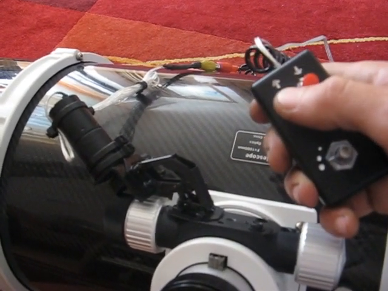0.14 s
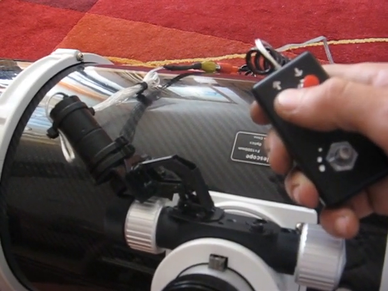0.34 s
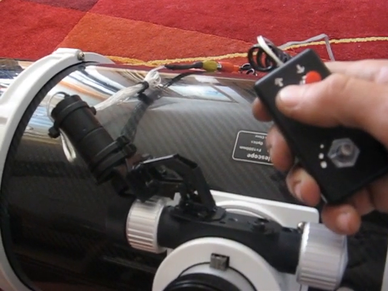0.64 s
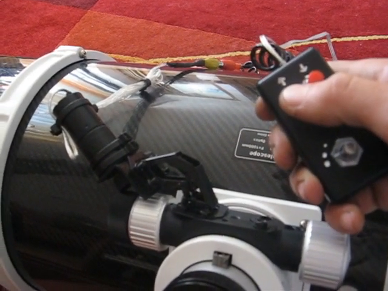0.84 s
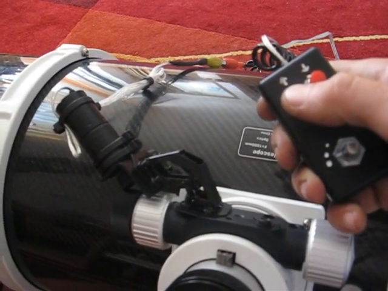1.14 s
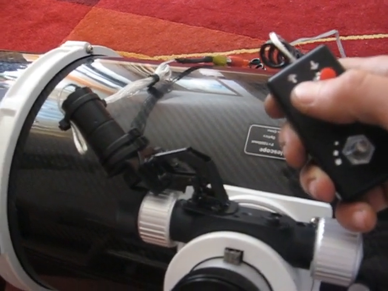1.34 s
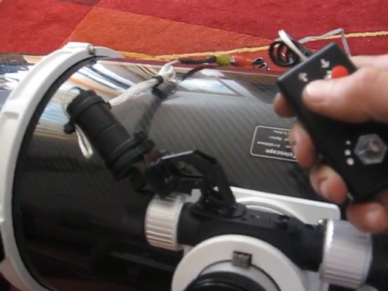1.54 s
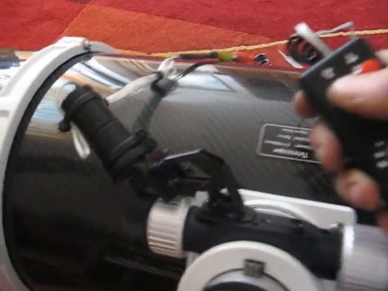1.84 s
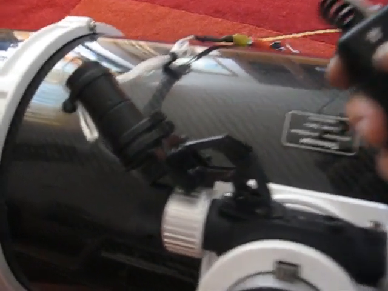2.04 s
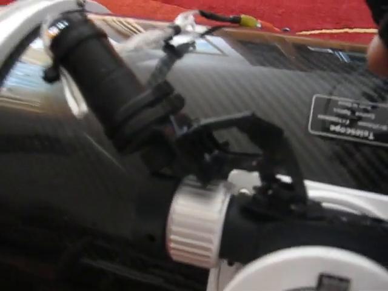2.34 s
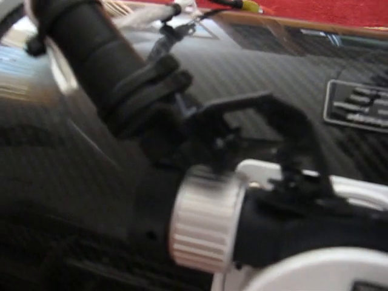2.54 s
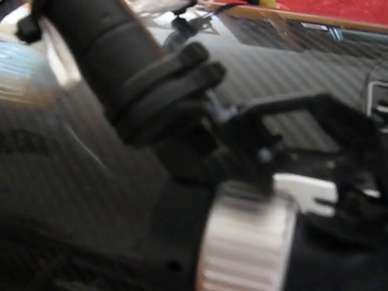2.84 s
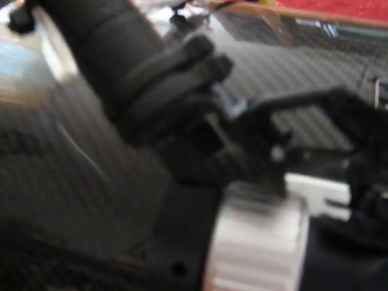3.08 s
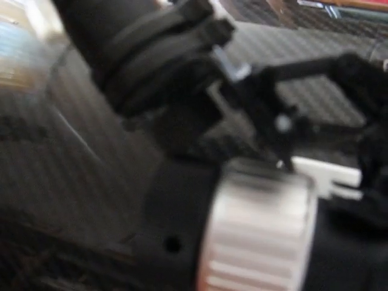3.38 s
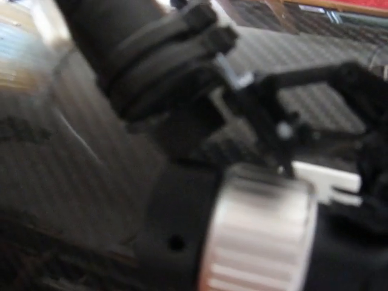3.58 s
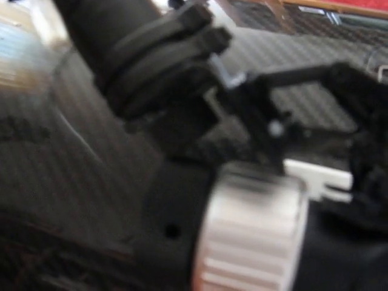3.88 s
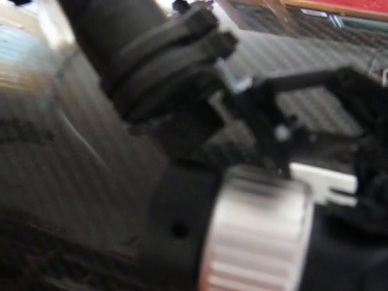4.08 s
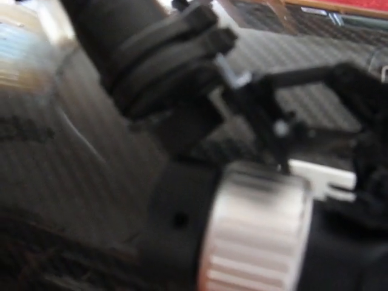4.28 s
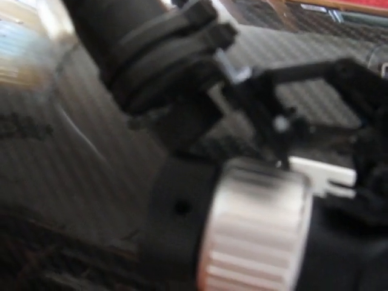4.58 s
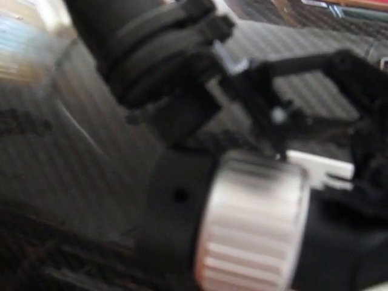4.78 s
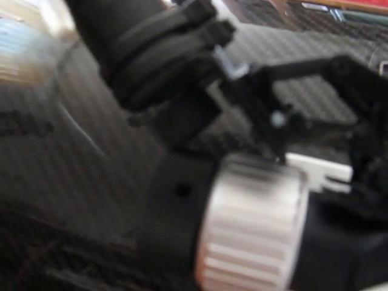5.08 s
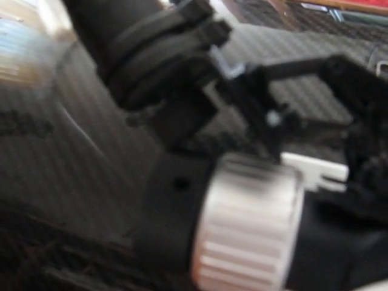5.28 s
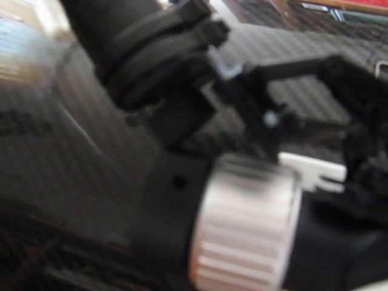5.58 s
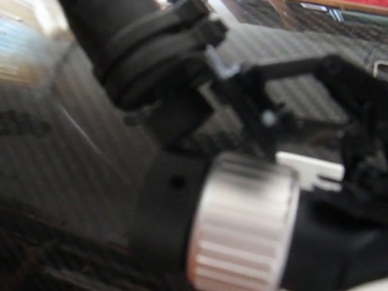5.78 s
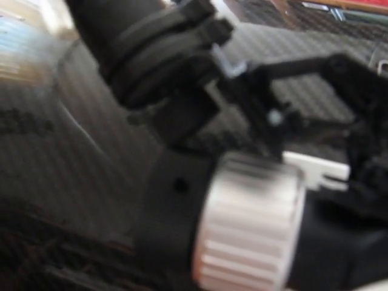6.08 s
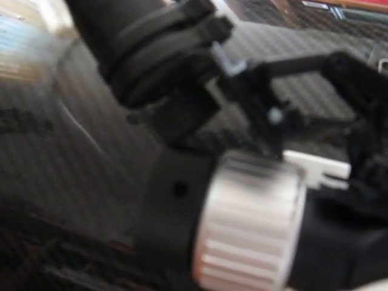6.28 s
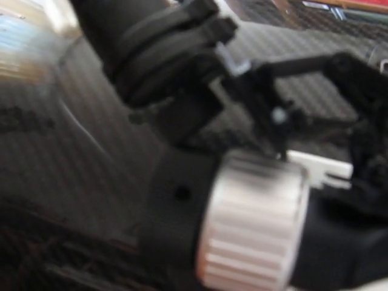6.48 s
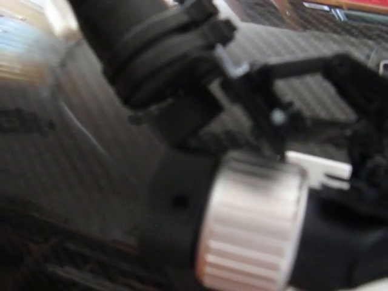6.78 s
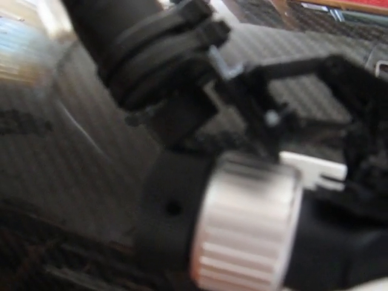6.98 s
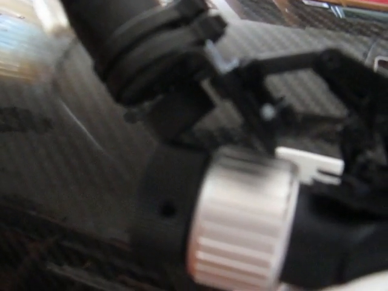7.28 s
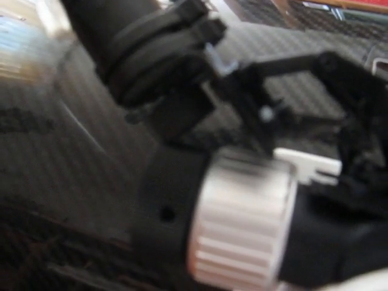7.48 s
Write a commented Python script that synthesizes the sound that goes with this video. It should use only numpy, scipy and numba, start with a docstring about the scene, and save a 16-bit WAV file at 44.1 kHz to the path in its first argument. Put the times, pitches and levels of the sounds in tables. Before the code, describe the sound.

A small geared electric motor turns a telescope's focus knob with a steady, hissy whir and a high whine. It grows louder as the microphone moves in, with a few soft knocks. The motor stops with sharp clicks of gears and a button, then restarts almost at once, chafing with a thin squeal, and ends on a click. The sound is close, dry and slightly grainy, in a small room.

```python
"""A small geared DC motor turns a telescope's focus knob, worked from a push-button box in a small room.
It runs forward, its 12-tooth pinion whining and rattling in the gearbox. The microphone moves in, with
soft knocks; late in the run the coupling rubs. At 5.4 s the motor stops; gears and a button click.
From 5.7 s it runs back, chafing and squealing once a turn, and stops with a click at 7.5 s.
A pocket camera takes the sound in mono, 8 bits at 11025 Hz."""
import sys
import numpy as np
from scipy import signal
from scipy.fft import rfft, irfft, next_fast_len
from scipy.io import wavfile
from numba import njit

SR = 44100
rng = np.random.default_rng(int(sys.argv[2]) if len(sys.argv) > 2 else 0)


def file_out(sig):
    """Save sig as 16-bit WAV at sys.argv[1]."""
    # one column per channel
    cols = np.atleast_2d(sig).T
    # limit, then scale
    lim = np.clip(cols, -1, 1)
    pcm = np.round(lim * 32767).astype(np.int16)
    wavfile.write(sys.argv[1], SR, pcm)


N = 336483
T = np.arange(N) / SR
TEETH, COMMUTATOR_BARS = 12, 3
# levels/dB: afar, beside the motor, at the coupling, running back
RATTLE_DB, MESH_DB = (-36.5, -31, -31.5, -34.5), (-52.5, -46.3, -47.5, -56)
# housing resonances: f/Hz, width/Hz, relative level/dB (afar, beside, coupling, back)
HOUSING_MODES = [(2051, 220, -11, -13, -16, -26), (2260, 240, -11, -11.5, -12, -12.5),
                 (2730, 200, -6.5, -6.5, -6, -8.5), (2992, 280, -7, -4, -2, -7),
                 (3490, 260, -6, -4, -7.5, -6), (3739, 220, -4, -4.5, -2, -5),
                 (3956, 240, -14, -5, -10, -6.5), (4580, 220, -1.5, -8, -3, -30),
                 (4770, 200, -8, -11, -5, -7.5), (4985, 160, -5, -6, -5, -11),
                 (5162, 220, -2, -8.5, -7, -11.5), (5472, 280, -11, -4, -5.5, -5.5)]
# weak shaft harmonics: order, level/dB re rattle (afar, beside, coupling, back)
SHAFT_HARMONICS = [dict(order=1, db=(-21.5, -27.5, -27, -37)), dict(order=4, db=(-38.5, -31, -30.5, -34.5)),
                   dict(order=5, db=(-20, -26, -36.5, -30)), dict(order=8, db=(-32, -25, -34, -44.5)),
                   dict(order=9, db=(-24.5, -26, -34.5, -33.5)),
                   dict(order=10, db=(-32, -29, -31.5, -38.5)),
                   dict(order=14, db=(-30.5, -28.5, -28.5, -38)),
                   dict(order=15, db=(-39, -28, -27.5, -41.5)),
                   dict(order=16, db=(-27, -35.5, -38.5, -39.5)), dict(order=23, db=(-32, -25, -29.5, -25)),
                   dict(order=24, db=(-31, -24.5, -27.5, -23)), dict(order=35, db=(-31, -35.5, -31.5, -23)),
                   dict(order=36, db=(-12.5, -15, -20, -43.5)), dict(order=37, db=(-24.5, -32, -26, -20)),
                   dict(order=38, db=(-19.5, -19, -24.5, -22)),
                   dict(order=40, db=(-14.5, -23.5, -27, -23.5)),
                   dict(order=41, db=(-17.5, -23.5, -25, -26)), dict(order=44, db=(-21.5, -19.5, -29, -24)),
                   dict(order=46, db=(-23, -28, -34, -40)), dict(order=49, db=(-19.5, -22, -32, -34)),
                   dict(order=60, db=(-31.5, -15.5, -11, -27))]
# slow wheels pressing on the teeth: turns per shaft turn, depth/dB
SLOW_WHEELS = [(.1485, .55), (.548, .45)]


def from_db(db):
    """Decibels to gain."""
    return 10 ** (np.asarray(db) / 20)


def rms_one(x):
    """Scale to rms 1."""
    return x / np.sqrt(np.mean(x ** 2) + 1e-20)


def in_time(rows):
    """Each column of a breakpoint table at every sample."""
    times_s, *columns = np.transpose(rows)
    return [np.interp(T, times_s, column) for column in columns]


def low_pass(x, hz):
    """Second-order Butterworth."""
    return signal.sosfilt(signal.butter(2, min(hz, SR / 3), fs=SR, output="sos"), x + 1e-18)


def drift(hz):
    """Slow noise up to about hz; rms 1."""
    step = 20
    slow = low_pass(rng.standard_normal((N + SR) // step + 2), hz * step)[SR // step:]
    return rms_one(np.interp(T, np.arange(len(slow)) * step / SR, slow))


def dying(start_s, tau_s):
    """1 until start_s, then exponential decay."""
    return np.exp(-np.maximum(T - start_s, 0) / tau_s)


def swell(centre_s, half_width_s):
    """Gaussian bump, peak 1."""
    return np.exp(-((T - centre_s) / half_width_s) ** 2)


@njit
def resonance(x, hz, width_hz):
    """Two-pole band-pass, peak gain 1, moving centre."""
    r, y = np.exp(-np.pi * width_hz / SR), np.zeros(len(x))
    for i in range(2, len(x)):
        drive = (x[i] - x[i - 2]) * (1 - r * r) / 2
        y[i] = drive + 2 * r * np.cos(2 * np.pi * hz[i] / SR) * y[i - 1] - r * r * y[i - 2]
    return y


def heard_from(place, levels_db):
    """Each partial radiates its own way: level/dB along the microphone's path."""
    return np.interp(place, np.arange(len(levels_db)), levels_db)


def shaft(full_hz, on_s, off_s, flutter, coast_db, coast_s):
    """Run-up from rest and coast-down: shaft turns, and a gate for the sound."""
    run_up = 1 - dying(on_s, tau_s=.051)
    creep_hz = .143 * (T - on_s)   # the grease loosens
    lag_hz = .7 * dying(on_s, tau_s=.35)
    speed_hz = full_hz * run_up + creep_hz - lag_hz
    turns = np.cumsum(speed_hz * (1 + flutter * drift(12))) / SR
    coasting = from_db(coast_db) * dying(off_s, coast_s)
    return turns, low_pass((T >= on_s) * np.where(T < off_s, 1, coasting), 300)


def gear_effort_db(start_s, depth_db, rise_s, waver_db):
    """The gears grow loud, then waver with the load."""
    return -depth_db * dying(start_s, rise_s) + waver_db * drift(5.6)


def tooth_forces(turns, chafe_db, scatter, slide_db, mesh_depth, uneven_db):
    """One force per housing mode: teeth land unevenly, then slide; an off-centre wheel chafes each turn."""
    angle = 2 * np.pi * turns
    lands = np.diff(np.floor(TEETH * turns), prepend=0) > 0
    grip = 1 + mesh_depth * np.cos(TEETH * angle)
    chafe = np.cos(angle) + .5 * np.cos(2 * angle) + .15 * np.cos(TEETH / 2 * angle)
    wheels_db = sum(db * np.cos(ratio * angle) for ratio, db in SLOW_WHEELS)
    pressure = from_db(chafe_db * chafe + uneven_db * drift(70) + wheels_db)
    for _ in HOUSING_MODES:
        impacts = rms_one(lands * rng.choice([-1, 1], N) * (1 + scatter * rng.standard_normal(N)))
        sliding = from_db(slide_db) * grip * rng.standard_normal(N)
        yield (impacts + sliding) * pressure


def gearbox(forces, levels_db):
    """The housing rings in modes that wander in pitch and level; rms 1."""
    modes = [resonance(force, hz * (1 + .01 * drift(5)), float(width_hz)) * from_db(db + .5 * drift(9))
             for force, (hz, width_hz, *_), db in zip(forces, HOUSING_MODES, levels_db)]
    return rms_one(sum(modes))


def tube_vibration():
    """Dull noise of the tube that carries the motor; rms 1."""
    # tube spectrum: f/Hz, relative density/dB
    spectrum = [(25, -2), (60, -2.5), (160, -2.5), (400, -2), (700, -3), (1000, -6), (1350, -2),
                (1900, -2.5), (3000, -11), (6000, -22)]
    hz, level_db = np.transpose(spectrum)
    size = next_fast_len(N)
    bins_hz = np.maximum(np.arange(size // 2 + 1) * SR / size, 1)
    gain = from_db(np.interp(np.log(bins_hz), np.log(hz), level_db))
    return rms_one(irfft(rfft(rng.standard_normal(N), size) * gain, size)[:N])


def tone(turns, order, rms_db):
    """One shaft harmonic, random phase."""
    return np.sqrt(2) * from_db(rms_db) * np.sin(2 * np.pi * (order * turns + rng.random()))


def weak_harmonics(turns, on_s, rattle_db, levels_db, play_turns):
    """Starting torque lifts the harmonics at first; bearing play blurs the high ones most."""
    loaded_db = rattle_db + 6 * dying(on_s, tau_s=.12)
    shaken = turns + play_turns * drift(60)
    return sum(tone(shaken, row["order"], loaded_db + db) for row, db in zip(SHAFT_HARMONICS, levels_db))


def forward_mesh(turns, mesh_db):
    """Mesh tone, throbbing with a slow wheel; in two steps the coupling rubs it louder and rougher."""
    rub_db = 4 * (1 - dying(3.74, tau_s=.06)) + 2.3 * (1 - dying(4.72, tau_s=.06))
    throb = .13 * np.cos(2 * np.pi * SLOW_WHEELS[0][0] * turns)
    mesh = tone(turns + .0022 * drift(40), TEETH, mesh_db + rub_db)
    roughness = from_db(rub_db - 18) * drift(90)
    sideband = tone(turns, TEETH + 1, mesh_db + 2 * rub_db - 17)   # the rub comes once a turn
    return mesh * (1 + throb + roughness) + sideband


def ringing_band(hz, width_hz=170):
    """Noise keeps a narrow, steep-sided resonance ringing; rms 1."""
    centre_hz, width_hz = hz * np.ones(N), float(width_hz)
    band = resonance(rng.standard_normal(N), centre_hz, width_hz)
    return rms_one(resonance(band, centre_hz, width_hz))


def motor_forward():
    """The teeth mesh evenly and whine on their fourth harmonic. Returns noise, tones."""
    # microphone path: t/s, place (0 afar, 1 beside the motor, 2 at the coupling)
    path = [(0, 0.01), (1.2, 0.05), (1.7, 0.23), (2.05, 0.55), (2.45, 1.0), (3.0, 1.1), (3.5, 1.4),
            (3.9, 2.0), (5.4, 2.2)]
    # commutator hum: t/s, level/dB
    hum_curve = [(0.1, -62), (0.39, -57), (1.58, -59), (1.95, -50.5), (2.64, -47), (3.07, -61.5),
                 (4.6, -53), (4.82, -59.5), (5.38, -54.5)]
    # mesh whine: t/s, level/dB
    whine_curve = [(0.02, -51.5), (0.14, -49), (0.35, -44.3), (0.72, -40.6), (1.0, -42), (1.58, -42.6),
                   (1.95, -38.2), (2.4, -47), (2.66, -39.3), (2.95, -40), (3.15, -44), (3.75, -44.5),
                   (4.03, -40.7), (4.3, -44.3), (5.3, -42.7)]
    # gear noise surges and dips as the microphone moves in: t/s, half-width/s, gain/dB
    surges = [(2.62, .3, 1.1), (3.15, .08, -1.5), (3.55, .18, -1.1)]
    # brief narrow-band swells of ringing in the gear noise: t/s, half-width/s, f/Hz, level/dB
    ring_swells = [(1.999, .11, 4560, -42), (2.065, .08, 2907, -41.5), (2.331, .15, 3790, -42),
                   (2.601, .18, 3580, -42.5), (2.62, .15, 5500, -45.5), (3.299, .06, 2636, -43.5),
                   (3.299, 0.14, 4410, -44), (5.3, .25, 1203, -48)]
    on_s, off_s = -.19, 5.414
    (place,), (hum_db,), (whine_db,) = in_time(path), in_time(hum_curve), in_time(whine_curve)
    turns, gate = shaft(92.6, on_s, off_s, flutter=.0004, coast_db=-35, coast_s=.01)
    effort_db = gear_effort_db(on_s, depth_db=30.5, rise_s=.21, waver_db=.2)
    effort_db += sum(db * swell(at_s, width_s) for at_s, width_s, db in surges)
    rattle_db = effort_db + heard_from(place, RATTLE_DB[:-1])

    chafe_db = heard_from(place, (1.5, .8, .65))
    forces = tooth_forces(turns, chafe_db, scatter=.22, slide_db=-1, mesh_depth=.35, uneven_db=.45)
    modes_db = [heard_from(place, row[2:-1]) for row in HOUSING_MODES]
    noise = from_db(rattle_db) * gearbox(forces, modes_db)
    for at_s, width_s, hz, db in ring_swells:
        noise += from_db(db) * swell(at_s, width_s) * ringing_band(hz)
    noise += from_db(rattle_db - 15) * tube_vibration()

    harmonics_db = (heard_from(place, row["db"][:-1]) for row in SHAFT_HARMONICS)
    tones = weak_harmonics(turns, on_s, rattle_db, harmonics_db, play_turns=.0012)
    tones += tone(turns, COMMUTATOR_BARS, hum_db + .5)
    tones += forward_mesh(turns, effort_db + heard_from(place, MESH_DB[:-1]))
    jitter_turns = .0003 * place ** 2 * drift(60)
    tones += tone(turns + jitter_turns, 4 * TEETH, whine_db) * (1 + .03 * drift(25))
    return gate * noise, gate * tones


def ring(hz, crest_s):
    """A struck mode: swells to 1 at crest_s, then dies quickly."""
    t = T[:SR // 20]
    return t / crest_s * np.exp(1 - t / crest_s) * np.cos(2 * np.pi * hz * (t - crest_s))


def knocks():
    """Dull, damped bumps that reach the microphone as it moves in."""
    # bumps: t/s, f/Hz, level/dB, rise/s
    bumps = [(2.953, 1250, -34, .0005), (2.992, 1440, -37.5, .001), (3.228, 1420, -34, 0.0011),
             (3.445, 1200, -31.5, .0005), (3.661, 1450, -33, .0004), (3.671, 90, -42, 0.0018),
             (4.886, 95, -36, 0.0028)]
    out = np.zeros(N)
    for at_s, hz, db, crest_s in bumps:
        blow, start = from_db(db) * ring(hz, crest_s), round(at_s * SR)
        out[start:start + len(blow)] += blow
    return out


def clicks():
    """Hard contacts: a bright ring, a plastic knock and a soft thump of the mount."""
    # gears taking up play, and a button: t/s, ring f/Hz, ring/dB, knock/dB, thump/dB
    contacts = [(5.4124, 3500, -35, -16.5, -53), (5.4132, 3450, -20.5, -51, -26.5),
                (5.537, 3400, -26, -37, -71.5), (5.5374, 3400, -36, -20.5, -54.5),
                (5.539, 3750, -28, -50, -66.5), (5.5401, 3600, -33.5, -34.5, -66.5),
                (5.7065, 3860, -19.5, -49.5, -72), (5.7079, 2900, -33, -50, -76),
                (5.7105, 3500, -42, -34, -76), (7.5182, 3700, -29, -50, -70),
                (7.5204, 3500, -32, -22.5, -32), (7.5216, 3600, -20, -38, -60)]
    # modes of the ring: frequency ratio, relative level/dB, rise/s
    modes = [(.46, -11, .00016), (.8, -9, .0002), (1, 0, .0003), (1.4, -13, .00012)]
    out = np.zeros(N)
    for at_s, hz, ring_db, knock_db, thump_db in contacts:
        bright = sum(from_db(ring_db + db) * ring(hz * ratio, crest_s) for ratio, db, crest_s in modes)
        knock = from_db(knock_db) * ring(hz=1110, crest_s=.000071)
        thump = from_db(thump_db) * ring(hz=45, crest_s=.0009)
        start = round(at_s * SR)
        out[start:start + len(bright)] += bright + knock - thump
    return out


def motor_back():
    """The other flanks bear: once-a-turn chafe and squeal, third-harmonic whine. Returns noise, tones."""
    # commutator hum: t/s, level/dB
    hum_curve = [(5.8, -86), (5.874, -73), (6.376, -56), (7.078, -53), (7.12, -69.5), (7.5, -64.5)]
    # upper flank squeal: t/s, f/Hz, level/dB
    upper_curve = [(5.74, 3900, -66.5), (5.82, 3880, -46.5), (5.89, 3780, -42), (5.95, 3684, -43),
                   (6.04, 3720, -40), (6.14, 3715, -36), (6.32, 3740, -42), (6.43, 3763, -36.5),
                   (6.5, 3780, -38.5), (6.57, 3760, -40), (6.7, 3804, -37.5), (6.86, 3855, -40),
                   (7.03, 4053, -39), (7.12, 3910, -48.5), (7.4, 3646, -42.5)]
    # lower flank squeal: t/s, level/dB
    lower_curve = [(5.74, -72), (5.82, -54), (6.02, -49), (6.16, -43.5), (6.43, -45), (6.5, -41.5),
                   (6.57, -50), (6.86, -47), (7.03, -52), (7.4, -52)]
    # whines during spin-up: mesh harmonic, t/s, half-width/s, level/dB at full effort
    spin_up_whines = [(3, 5.82, .03, -44), (4, 5.825, .02, -40), (5, 5.82, .036, -37)]
    on_s, off_s, backlash_s = 5.712, 7.522, .034
    (hum_db,), (lower_db,) = in_time(hum_curve), in_time(lower_curve)
    upper_hz, upper_db = in_time(upper_curve)
    turns, gate = shaft(92.72, on_s, off_s, flutter=.0008, coast_db=-18.5, coast_s=.1)
    effort_db = gear_effort_db(on_s + backlash_s, depth_db=23.5, rise_s=.13, waver_db=.56)
    rattle_db = effort_db + RATTLE_DB[-1]

    forces = tooth_forces(turns, chafe_db=2.5, scatter=.15, slide_db=4, mesh_depth=.45, uneven_db=.4)
    noise = from_db(rattle_db) * gearbox(forces, [row[-1] for row in HOUSING_MODES])
    squeals = from_db(upper_db) * ringing_band(upper_hz, width_hz=270)
    squeals += from_db(lower_db) * ringing_band(hz=2900)
    noise += squeals * (1 + .6 * np.cos(2 * np.pi * turns))
    noise += from_db(rattle_db - 14) * tube_vibration()

    harmonics_db = (row["db"][-1] for row in SHAFT_HARMONICS)
    tones = weak_harmonics(turns, on_s, rattle_db, harmonics_db, play_turns=.0017)
    tones += tone(turns, COMMUTATOR_BARS, hum_db + .5)
    tones += tone(turns, TEETH, effort_db + MESH_DB[-1]) * (1 + .17 * drift(70))
    for harmonic, at_s, width_s, db in spin_up_whines:
        whine = tone(turns + .0027 * drift(60), harmonic * TEETH, effort_db + db)
        tones += swell(at_s, width_s) * whine * (1 + .4 * drift(70))
    tones += tone(turns, 3 * TEETH, effort_db - 47.5) * (1 + .22 * drift(25))
    return gate * noise, gate * tones


def room(x, tail_db=-17, t60_s=.2):
    """Adds the short diffuse tail of a carpeted room."""
    t = T[:SR // 2]
    tail = rng.standard_normal(len(t)) * np.exp(-np.log(1000) * t / t60_s) * (t > .003)
    return x + from_db(tail_db) * signal.fftconvolve(x, tail / np.linalg.norm(tail))[:N]


def scene():
    """Both runs, knocks and clicks at one microphone; the tones stay dry."""
    forward_noise, forward_tones = motor_forward()
    back_noise, back_tones = motor_back()
    mono = room(forward_noise + knocks() + clicks() + back_noise) + forward_tones + back_tones
    return np.array([mono, mono])


def record(dry):
    """8 bits at SR/4: faint tails crumble into ticks, then silence; high lines mirror about 5.5 kHz."""
    decimation, levels_per_unit, cutoff_hz = 4, 128, 7200
    anti_alias = signal.firwin(53, SR / (2 * decimation), window=("kaiser", 6), fs=SR)
    sampled = signal.fftconvolve(dry[0], anti_alias, "same")[::decimation]
    pulses = np.zeros(N)
    pulses[::decimation] = decimation * np.round(sampled * levels_per_unit) / levels_per_unit
    smooth = signal.fftconvolve(pulses, anti_alias, "same")
    out = signal.sosfilt(signal.ellip(10, .1, 70, cutoff_hz, fs=SR, output="sos"), smooth)
    return np.array([out, out])


dry = scene()
out = record(dry)
file_out(out)
```